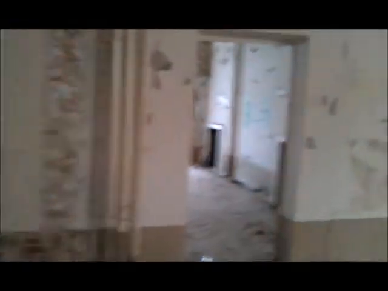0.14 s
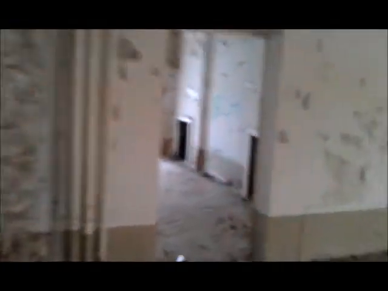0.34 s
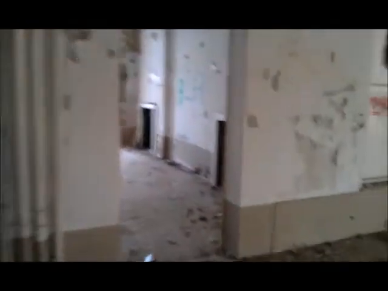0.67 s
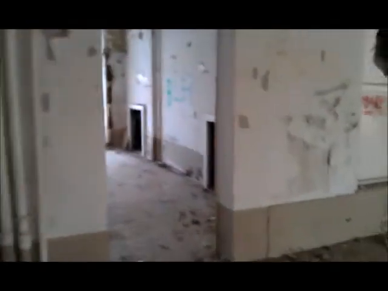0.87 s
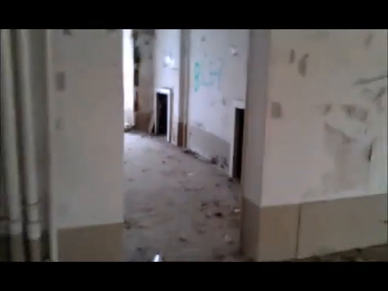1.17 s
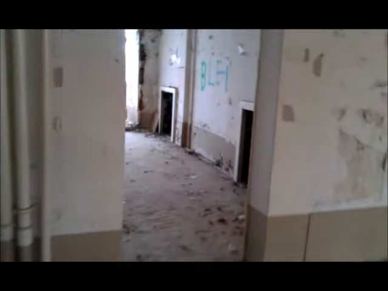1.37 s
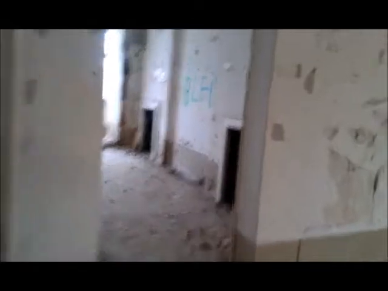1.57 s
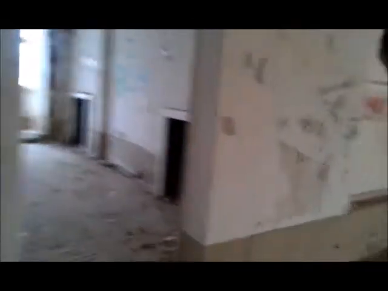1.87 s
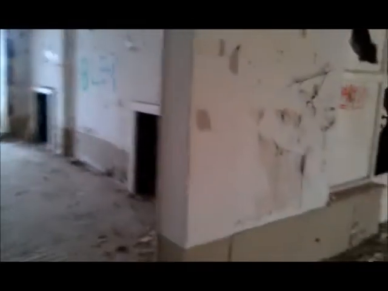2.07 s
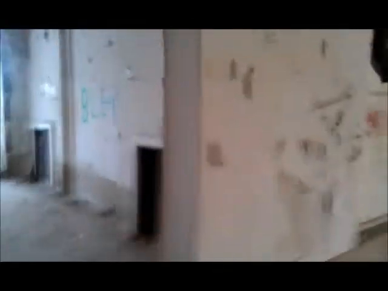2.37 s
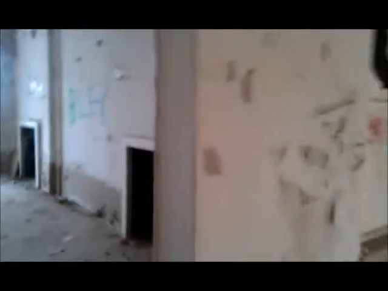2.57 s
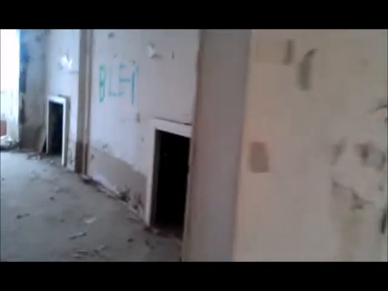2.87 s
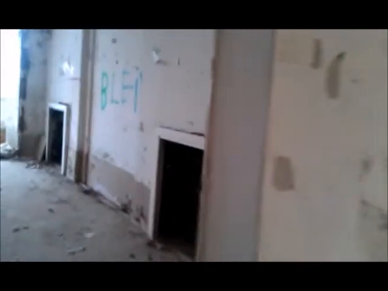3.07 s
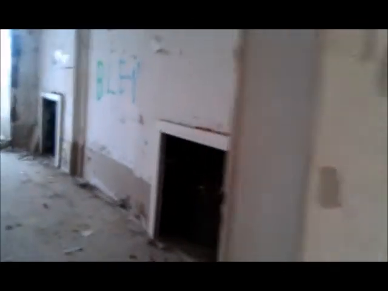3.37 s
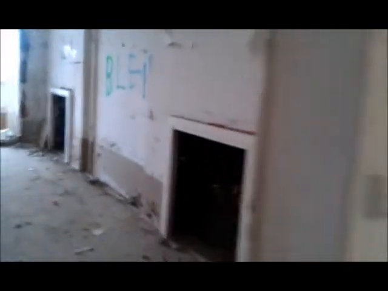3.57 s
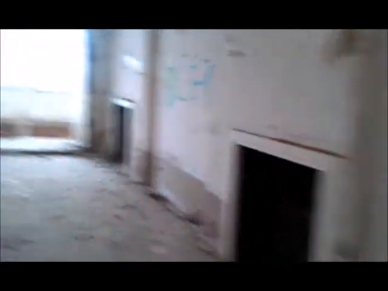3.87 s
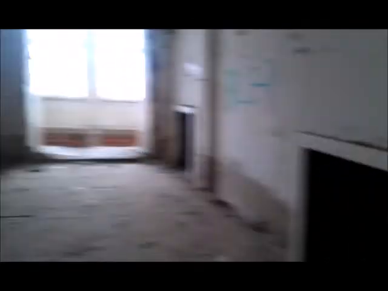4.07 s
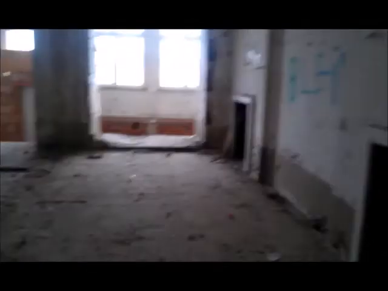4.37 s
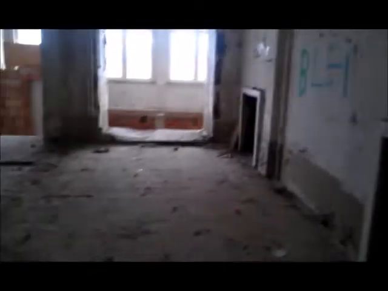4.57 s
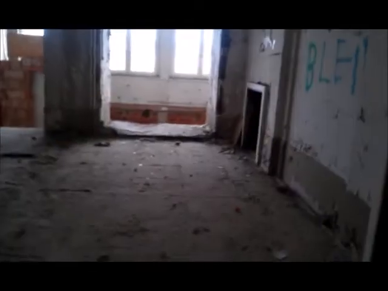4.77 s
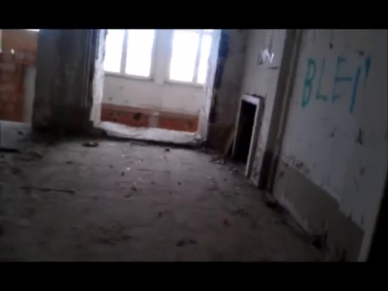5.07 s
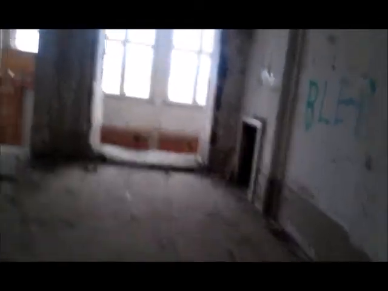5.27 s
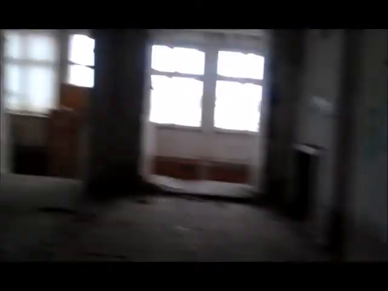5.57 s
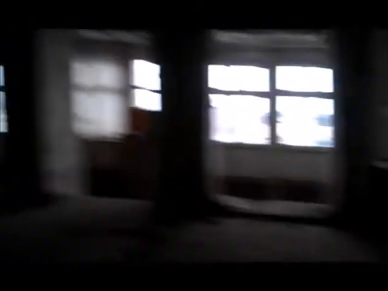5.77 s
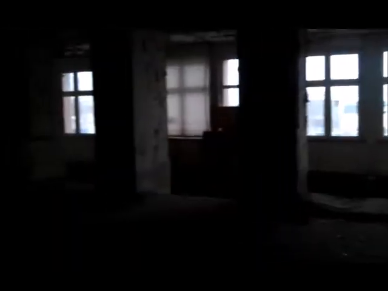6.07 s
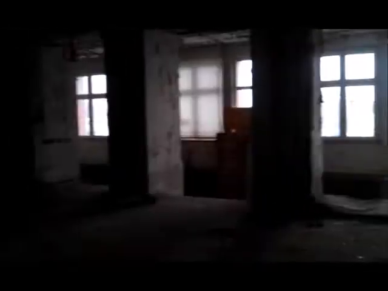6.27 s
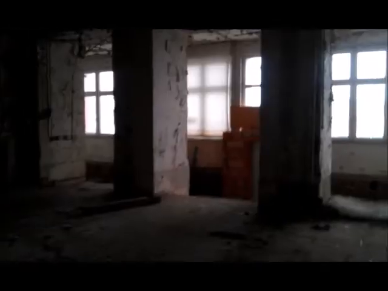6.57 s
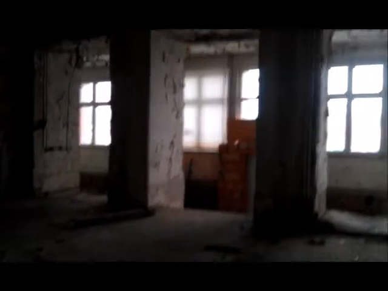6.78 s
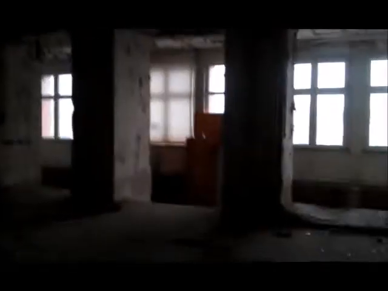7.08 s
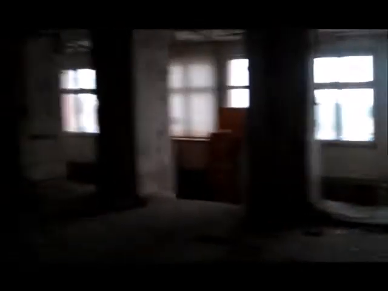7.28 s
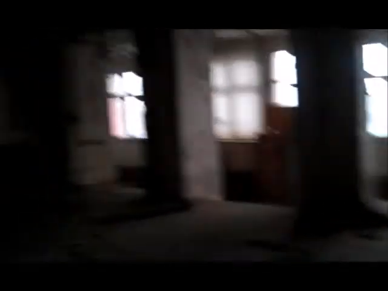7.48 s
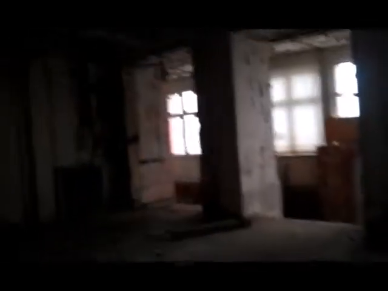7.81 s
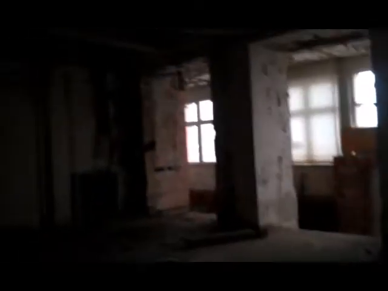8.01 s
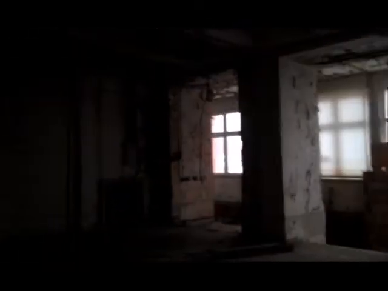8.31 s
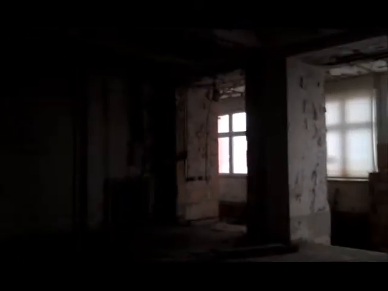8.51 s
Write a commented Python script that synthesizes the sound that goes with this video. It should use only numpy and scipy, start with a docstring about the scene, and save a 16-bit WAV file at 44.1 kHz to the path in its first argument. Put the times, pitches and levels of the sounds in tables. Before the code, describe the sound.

Shoes crush grit and debris on a concrete floor in uneven, crackling steps, over a soft, steady hush from outside.

```python
"""An empty building: shoes crunch over grit and plaster chips on its concrete floor, under a hand-held camera.
Each step crushes fine grit, coarser chips and dust, whose fractures sound as tiny damped oscillations.
Sharp snaps of grit and a few low, dull knocks stand out. A loose tile shard rings, a sole slides on sand
and thuds reach the camera body. The bare walls reverberate briefly, over a steady hush from outdoors."""
import sys
import numpy as np
from scipy import signal
from scipy.fft import rfft, irfft, next_fast_len
from scipy.io import wavfile
from scipy.ndimage import map_coordinates

SR = 44100
rng = np.random.default_rng(int(sys.argv[2]) if len(sys.argv) > 2 else 0)


def materialize(psi):
    """Save the field psi as 16-bit PCM at rate SR to the path in sys.argv[1].

    A 1-D psi becomes a single channel; in a 2-D psi each row is a channel.
    """
    bounded = np.clip(np.atleast_2d(psi).T, -1, 1)
    quanta = np.round(bounded * 32767).astype(np.int16)
    wavfile.write(sys.argv[1], SR, quanta)


N = 381405

# Strength of the outdoor hush. Each row: time in seconds, level in dB.
HUSH_LEVELS = [(0.0, -43.5), (2.5, -44), (8.65, -47)]
# Spectrum of the hush. Each row: frequency in Hz, relative spectral density in dB.
HUSH_SPECTRUM = [(30, 9.5), (150, 4), (300, 10.5), (850, 7.5), (2300, -3.5), (3300, -11), (5400, -10),
                 (7200, -24), (15000, 3.5), (20000, -18.5)]
# Reverberation of the room. Each row: frequency in Hz, time to fall 60 dB in seconds.
REVERB_TIMES = [(300, 0.11), (2000, 0.073), (6000, 0.024), (14000, 0.084)]
# Knocks on the camera body. Each row: start in seconds, level in dB, time to fall to 1/e in seconds.
BODY_KNOCKS = [(2.451, 3, 0.0032), (3.659, -21, 0.0013), (5.786, -37, .001), (7.306, -24, .0015)]
# A sole sliding on sand. Each row: time in seconds, level in dB.
SLIDE_LEVELS = [(5.0, -99), (5.06, -49), (5.1, -36), (5.28, -36), (5.39, -54.5), (5.47, -47.5), (5.6, -51),
                (5.7, -78)]
# Rasp of its tread. Each row: frequency in Hz, relative gain in dB.
TREAD_RESPONSE = [(2000, -24), (3600, -12), (4100, 0), (4400, -8), (4730, -4), (5300, -11), (8000, -24)]
# Modes of the tile shard. Each row: frequency in Hz, relative level in dB, time to fall 60 dB in seconds.
SHARD_MODES = [(1906, 0, .045), (2046, -4, .04), (3354, -9, .025), (1740, -10, .03), (2300, -10, .03)]
# Knocks on the shard. Each row: start in seconds, level in dB.
SHARD_KICKS = [(5.806, -14), (5.834, -22), (5.882, -24), (7.827, -18)]
# Sharp snaps of grit and a few low, dull knocks. Each row: start in seconds, relative level in dB,
# pitch in Hz, nominal decay in cycles, of which each part of the sound takes a fraction.
SNAPS_AND_KNOCKS = [(0.1247, -26, 3700, 2.7), (0.251, -25, 2060, 0.94), (0.8864, -23.5, 4700, 5.1),
                    (0.942, -20, 3080, 1.6), (0.9555, -21.5, 2080, 2.3), (1.0052, -16, 4570, 2.2),
                    (1.6387, -8.5, 6800, 2.1), (1.647, -9.5, 4160, 2.4), (1.655, -14.5, 2960, 5.9),
                    (1.674, -11, 5150, 1.1), (1.707, -17, 4980, 2.1), (1.7367, -17, 5500, 5.6),
                    (1.9415, -25.5, 4600, 3.8), (1.9713, -25, 5000, 3.8), (2.3093, -24, 5300, 3.4),
                    (2.324, -20.5, 5330, 5.2), (2.4, -14, 3950, 2.1), (2.4428, -9, 5200, 1.2),
                    (2.445, -1, 3930, 1.6), (2.4511, 0, 10000, 0.92), (2.4928, -4, 5440, 2.3),
                    (2.498, 1, 5600, 3.1), (2.504, -21, 5080, 2.1), (2.5265, -10, 5930, 5),
                    (2.5348, -6, 5770, 7), (2.5472, -15, 5200, 7.7), (2.5527, -8.5, 4780, 15),
                    (2.6001, -26, 4380, 0.92), (2.7839, -11, 5850, 2), (2.814, -18, 5670, 9.2),
                    (2.9094, -22.5, 5740, 3.4), (3.117, -28, 5300, 7.5), (3.055, -26, 5370, 4.5),
                    (3.1582, -17.5, 5070, 2.1), (3.166, -14, 5300, 1.7), (3.2528, -18.5, 5930, 2.2),
                    (3.2771, -24, 4800, 2.3), (3.6195, -29.5, 2040, 3.2), (3.664, -13, 1200, 2),
                    (3.6666, -20, 5190, 0.71), (3.674, -17, 4520, 1.6), (3.682, -7, 5140, 4.2),
                    (3.706, -5, 4600, 3.9), (3.71, -0.5, 4770, 2.3), (3.724, -6, 5430, 6),
                    (3.7372, -13, 4500, 3), (3.7928, -15.5, 5070, 2.2), (3.7983, -16, 6960, 2.1),
                    (3.897, -17.5, 5970, 3.8), (3.937, -16, 6300, 3.1), (3.9726, -17.5, 5330, 2.5),
                    (4.1597, -15.5, 6100, 9.5), (4.372, -32, 5530, 2.3), (4.47, -21.5, 6150, 1.6),
                    (4.5801, -21.5, 5450, 2.2), (4.5928, -15, 6330, 4.5), (4.6273, -13.5, 5200, 3.7),
                    (4.649, -9, 6100, 4.4), (4.916, -11, 5530, 1.5), (4.9338, -12, 2830, 5.5),
                    (4.975, -12, 5000, 2.3), (5.1295, -7.5, 4020, 3.3), (5.177, -14, 5370, 4.8),
                    (5.183, -12, 5660, 4.8), (5.228, -13, 4950, 3.6), (5.785, -16, 820, 2.4),
                    (5.786, -15, 2500, 1.1), (5.798, -12.5, 750, 4.7), (5.8045, -3, 2410, 1.9),
                    (5.808, -5, 2100, 1.2), (5.811, 0.5, 1790, 3.2), (5.834, -11, 1930, 2.4),
                    (5.8437, -20, 2040, 2.8), (5.883, -20, 2470, 2.8), (5.9516, -9.5, 5000, 1.3),
                    (6.1866, -28, 5050, 2.8), (6.195, -27, 5300, 4), (6.2566, -28, 5110, 3.1),
                    (6.366, -28, 5500, 2.5), (6.4136, -30, 5000, 2.2), (6.6958, -19.5, 6300, 3.9),
                    (6.8879, -20, 2000, 0.7), (7.311, -3, 4400, 3), (7.3189, 2, 4640, 1.25),
                    (7.3651, -9, 4400, 1.3), (7.55, -25, 2500, 1.8), (7.591, -25, 5000, 0.82),
                    (7.8246, -12, 2870, 2.4), (8.3535, -28.5, 3200, 1), (8.4878, -28.5, 4580, 1.4)]
# Presses, rolls and scuffs of a sole. Each row: time of reaching full load in seconds,
# rise, hold and fall in seconds, levels of grit, chips and dust in dB.
SOLE_PRESSES = [(0.101, 0.016, .085, .08, -47, -50.5, -58), (0.299, 0.15, 0.0073, 0.14, -48.5, -52, -62),
                (0.377, 0.03, 0.014, 0.1, -42.5, -46, -55), (0.537, 0.026, 0.035, .13, -39, -91, -46),
                (0.742, 0.074, 0.023, 0.39, -49, -56, -51), (0.898, 0.029, 0.0035, .1, -41.5, -46.5, -54),
                (0.953, 0.034, 0.064, .1, -38, -45, -55), (1.119, 0.066, 0.0035, 0.082, -44.5, -47.5, -69),
                (1.383, 0.16, 0.023, 0.059, -52.5, -55, -64), (1.605, 0.0069, .135, 0.04, -33, -51, -43),
                (1.652, 0.035, 0.026, 0.073, -48, -35.5, -55), (2.005, 0.11, 0, 0.13, -42.5, -63, -47),
                (2.14, 0.077, 0, 0.11, -50, -51, -65), (2.255, 0.031, 0, 0.035, -47, -60, -60),
                (2.323, 0.059, 0, .1, -43.5, -49, -56), (2.41, .06, 0.091, .03, -29.5, -40, -55),
                (2.448, 0.0091, 0.008, .05, -36, -33, -30), (2.501, 0.041, 0.0088, .012, -27, -33.5, -25),
                (2.55, 0.11, 0, 0.048, -28, -60, -34), (2.574, .03, 0.0017, 0.16, -35.5, -42.5, -58),
                (2.788, 0.063, 0, 0.11, -28, -45.5, -33.5), (3.167, 0.083, 0.021, 0.071, -36, -46, -47),
                (3.281, 0.22, 0, .12, -43.5, -53, -43), (3.661, 0.0036, 0.046, 0.058, -27.5, -40, -28.5),
                (3.704, 0.022, 0.014, 0.027, -19.5, -39, -20),
                (3.79, 0.004, 0.0011, 0.059, -40, -52, -31.5), (3.958, 0.12, 0.011, .15, -38.5, -49.5, -42),
                (4.077, .01, 0.017, .06, -46, -46, -45.5), (4.156, 0.031, 0.033, 0.051, -47, -52, -35),
                (4.472, 0.15, 0, 0.078, -50, -64, -49.5), (4.6, 0.089, 0.029, 0.091, -46, -51, -52),
                (4.627, .01, 0, 0.046, -42, -50, -32), (4.891, 0.008, 0, .05, -42, -63, -49),
                (4.937, 0.032, 0, 0.12, -28.5, -41.5, -43), (5.128, 0.12, 0.16, .047, -38.5, -46, -45),
                (5.641, 0.017, 0.052, 0.28, -45.5, -55, -65),
                (5.783, 0.0097, 0.024, .03, -30.5, -26.5, -35), (5.836, 0.047, 0, 0.072, -36, -24, -58),
                (5.878, 0.009, 0.018, 0.048, -32.5, -26.5, -53), (5.926, .04, 0.029, .03, -38, -41, -45),
                (5.95, 0.012, 0.017, 0.033, -25, -28.5, -30), (6.013, .006, 0.017, 0.047, -48, -53, -64),
                (6.19, 0.0077, 0.011, .05, -44, -54, -47), (6.262, 0.025, 0, 0.097, -49, -65, -61),
                (6.37, 0.025, 0.0022, 0.094, -50, -57, -52), (6.699, 0.028, 0.018, .15, -45.5, -53.5, -51),
                (6.888, 0.0054, 0, 0.037, -53, -40, -62), (6.92, 0.058, 0.0065, 0.21, -51, -57, -53),
                (7.308, 0.0061, 0.023, 0.048, -22.5, -24.5, -21), (7.339, 0.018, 0, 0.18, -27.5, -33, -32),
                (7.53, 0.068, 0.022, 0.17, -62, -53, -53),
                (7.824, 0.0073, 0.0029, 0.051, -27.5, -32.5, -50),
                (7.887, 0.011, 0.037, 0.022, -58, -43.5, -58), (8.094, .02, 0, 0.027, -50, -58, -61),
                (8.357, 0.011, 0, 0.052, -47, -51, -48), (8.489, 0.0092, 0, 0.041, -55, -46.5, -48.5)]
# Response of the microphone. Each row: frequency in Hz, gain in dB.
MIC_RESPONSE = [(20, -51), (100, -27), (200, -10.5), (300, -7), (3000, 1.5), (6400, 2), (6950, -2.5),
                (10000, -7), (16000, -22.5)]

SWING_DB = 20  # change of level over a press's rise or fall time
REST_DB, REST_SINK_DB_PER_S = (-56.5, -57, -59.5), (0.84, .5, 0.4)  # between presses: grit, chips, dust


def amp(db):
    """Amplitude ratio of a level in decibels."""
    return 10 ** (np.asarray(db) / 20)


def unit(x):
    """Normalisation to an rms of 1."""
    return x / np.sqrt(np.mean(x ** 2) + 1e-20)


def along(points, hz):
    """Interpolation of (Hz, value) points on a logarithmic frequency axis."""
    knots_hz, values = np.transpose(points)
    return np.interp(np.log(hz + 1), np.log(knots_hz + 1), values)


def per_sample(times, values):
    """Linear interpolation in time, one value per sample."""
    return np.interp(np.arange(N) / SR, times, values)


def wobble(rate):
    """Smooth random modulation: a spline through rate Gaussian knots a second."""
    knots = rng.standard_normal(int(N * rate / SR) + 4)
    return map_coordinates(knots, [np.arange(N) * rate / SR])


def coloured(x, points):
    """Minimum-phase filtering with the gain of (Hz, dB) points."""
    size = 2 * next_fast_len(N // 2 + SR // 4)
    gain = amp(along(points, np.fft.rfftfreq(size, 1 / SR)))
    cepstrum = irfft(np.log(gain), size)
    cepstrum[1:size // 2] *= 2  # folding onto positive time makes the filter causal
    cepstrum[size // 2 + 1:] = 0
    return irfft(rfft(x, size) * np.exp(rfft(cepstrum)), size)[..., :N]


def pings(starts, gain, hz, cycles, samples):
    """Superposed damped sines: each builds up in about a cycle and decays by 1/e in the given cycles."""
    turns = np.arange(samples) / SR * hz[:, None]
    attack = (1 - np.exp(-turns / 0.37)) ** 2
    shape = np.sin(2 * np.pi * turns) * np.exp(-turns / cycles[:, None]) * attack
    shape /= np.abs(shape).max(axis=1, keepdims=True)
    index = (starts * SR).astype(int)[:, None] + np.arange(samples)
    return np.bincount(index.ravel(), (gain[:, None] * shape).ravel(), N + samples)[:N]


def grains(count, samples, hz, spread, cycles, scatter_db, clump_db):
    """Shot noise of rms 1: pings at random times, of log-normal pitch, swelling in clumps."""
    when, sign, rarity = rng.random((count, 3)).T
    pitch = np.clip(hz * np.exp(spread * rng.standard_normal(count)), 300, SR * .4)
    size_db = np.minimum(-np.log(rarity), 5) * scatter_db  # a few grains are much larger
    gain = np.sign(sign - .5) * amp(size_db) * np.sqrt(pitch / hz)
    crackle = pings(when * (N - 1) / SR, gain, pitch, np.full(count, cycles), samples)
    return unit(crackle * amp(clump_db * wobble(160)))


def outdoor_hush():
    """Transmission through openings: distant broadband noise drifts in at the window holes."""
    air = unit(coloured(rng.standard_normal(N), HUSH_SPECTRUM))
    level_db = per_sample(*np.transpose(HUSH_LEVELS))
    waver_db = .5 * wobble(3) + .7 * wobble(30)
    return amp(level_db + waver_db) * air


def wall_reverb(x):
    """Reverberation: diffuse reflections decay exponentially, each frequency at its own rate."""
    hz, t, spectra = signal.stft(rng.standard_normal(SR // 2), SR, nperseg=256)
    decay = amp(-60 * t / along(REVERB_TIMES, hz)[:, None])
    tail = signal.istft(spectra * decay, SR, nperseg=256)[1]
    delayed = np.pad(x, (90, 0))  # about 2 ms
    return signal.fftconvolve(delayed, tail / np.linalg.norm(tail))[:N]


def camera_thuds():
    """Dispersion: the treble of a knock arrives first, so it sweeps down to the bass without ringing."""
    out, t = np.zeros(N + SR), np.arange(SR // 20) / SR
    sweep = np.sin(174 * np.sqrt(t))
    for start, db, decay_s in BODY_KNOCKS:
        out[round(start * SR):][:len(t)] += amp(db) * sweep * np.exp(-t / decay_s)
    return out[:N]


def sole_slide():
    """Cavity resonance: the tread colours the noise of fine sand rolling beneath it."""
    sand = grains(count=60000, samples=32, hz=4400, spread=.2, cycles=.8, scatter_db=2.2, clump_db=1.2)
    level_db = per_sample(*np.transpose(SLIDE_LEVELS))
    return amp(level_db) * unit(coloured(sand, TREAD_RESPONSE))


def tile_shard():
    """Free vibration: each knock excites the shard's damped modes at new strengths."""
    out, t = np.zeros(N + SR), np.arange(SR // 4) / SR
    attack = 1 - np.exp(-t / 0.00074)
    for start, db in SHARD_KICKS:
        ring = sum(amp(mode_db + rng.normal(0, 2.5) - 60 * t / t60) * np.sin(2 * np.pi * hz * t)
                   for hz, mode_db, t60 in SHARD_MODES)
        out[round(start * SR):][:len(t)] += amp(db) * ring * attack
    return out[:N]


def snaps_and_knocks():
    """Damped transients: a grit snap or dull knock is one pulse, then two weaker, slightly detuned."""
    starts, db, hz, cycles = np.transpose(SNAPS_AND_KNOCKS)
    out = pings(starts, amp(db + 0.5), hz, 0.24 * cycles, samples=400)
    edge_hz = np.minimum(1.72 * hz, SR / 3)  # a higher partial sharpens the onset
    out += pings(starts, amp(db - 9.5), edge_hz, 0.87 * cycles, samples=64)
    for lag, detune in rng.standard_normal((len(starts), 2, 2)).T:
        later = starts + .0003 + .0006 * np.abs(lag)
        out += pings(later, amp(db - 5.5), hz * np.exp(0.098 * detune), 0.42 * cycles, samples=400)
    return out


def sole_load():
    """Incoherent addition: presses and a faint rest level sum in power to gains for grit, chips, dust."""
    hop = 32  # samples
    t = np.arange(N // hop + 2) * hop / SR
    full_at, rise, hold, fall, *levels_db = np.transpose(SOLE_PRESSES)[..., None]
    rising = np.maximum(full_at - t, 0) / rise
    falling = np.maximum(t - full_at - np.abs(hold), 0) / fall
    shape_db = -SWING_DB * (rising + falling)
    power = [per_sample(t, (amp(db + shape_db) ** 2).sum(axis=0)) for db in levels_db]
    rest_db = [per_sample(t, db - sink * t) for db, sink in zip(REST_DB, REST_SINK_DB_PER_S)]
    waver_db = 1.5 * wobble(8.7)
    return np.sqrt(power + amp(rest_db + waver_db) ** 2)


def crunch():
    """Granular crushing: three grain sizes break under the sole; smaller grains ring higher."""
    grit_gain, chips_gain, dust_gain = sole_load()
    grit = grains(count=40000, samples=64, hz=5310, spread=.22, cycles=1.9, scatter_db=2, clump_db=1.7)
    chips = grains(count=26000, samples=128, hz=2153, spread=.3, cycles=1.8, scatter_db=1.94, clump_db=2.2)
    dust = grains(count=60000, samples=32, hz=9800, spread=.39, cycles=.92, scatter_db=2.5, clump_db=3.5)
    return grit_gain * grit + chips_gain * chips + dust_gain * dust


def scene():
    """Superposition: the steps and their reverberation add to the thuds and the hush, in one channel."""
    steps = crunch() + snaps_and_knocks() + tile_shard() + sole_slide()
    return (steps + amp(-7.5) * wall_reverb(steps) + camera_thuds() + outdoor_hush())[None]


def record(dry):
    """Transduction: a small microphone colours the sound, which then saturates and is band-limited."""
    rumble_hz, top_hz = 110, 16400
    x = coloured(dry, MIC_RESPONSE)
    x = x / (1 + np.abs(x) ** 8) ** (1 / 8)  # soft clipping near full scale
    x = signal.sosfilt(signal.butter(2, rumble_hz, "highpass", fs=SR, output="sos"), x)
    return irfft(rfft(x) * (np.fft.rfftfreq(N, 1 / SR) < top_hz), N)


dry = scene()
out = record(dry)
materialize(out)
```